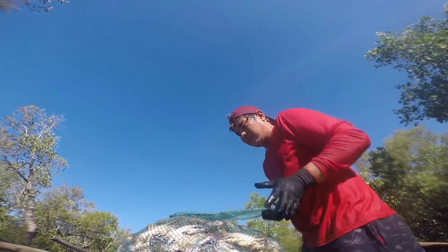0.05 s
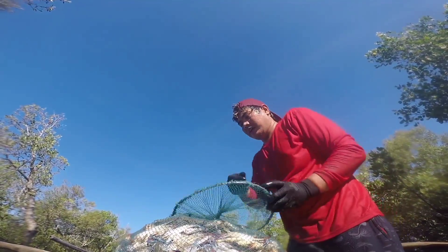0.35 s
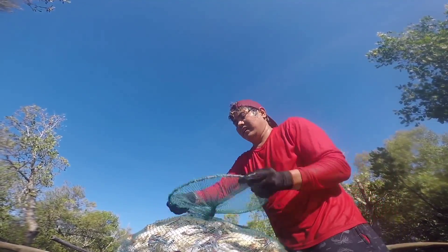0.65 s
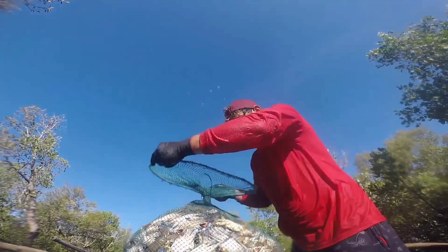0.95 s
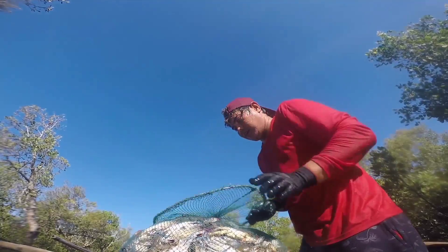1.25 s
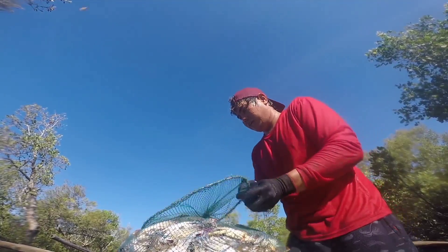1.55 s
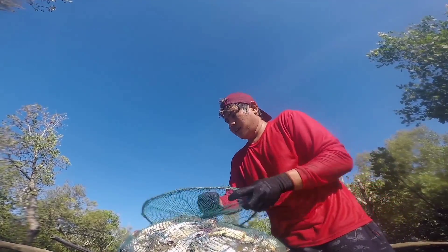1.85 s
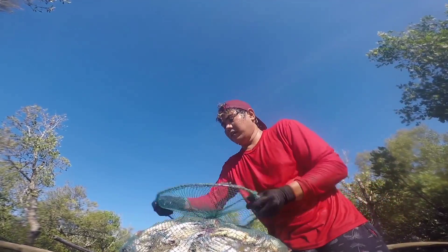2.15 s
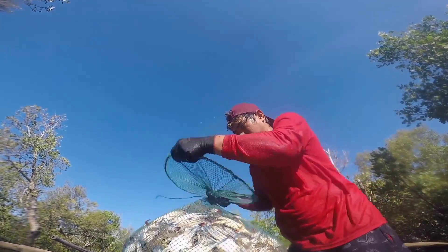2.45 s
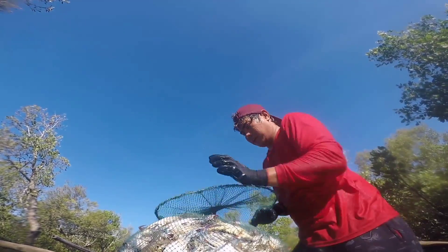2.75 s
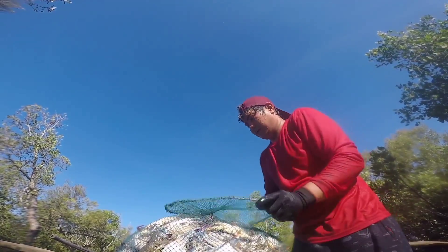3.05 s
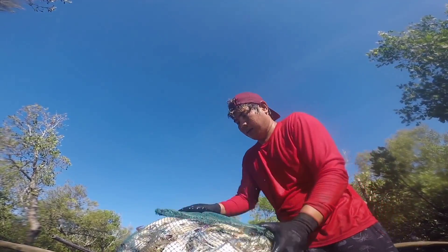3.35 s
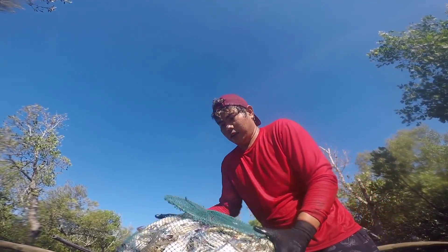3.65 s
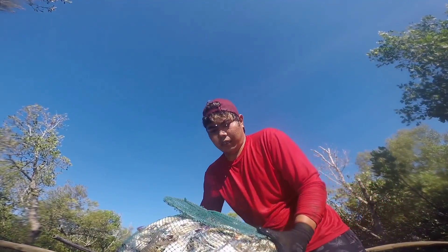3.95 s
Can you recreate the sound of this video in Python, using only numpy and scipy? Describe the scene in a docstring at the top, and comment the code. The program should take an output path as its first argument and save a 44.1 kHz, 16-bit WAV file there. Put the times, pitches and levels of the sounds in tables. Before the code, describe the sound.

Net traps knock, swish and rattle as they are turned over twice and stacked.

```python
"""Collapsible mesh crab traps are flipped twice and laid on a stack, beside a cased camera outdoors.
Friction makes the netting swish on each flip; the hoop thuds down and slides, and the stack rattles.
Impacts excite damped modes: frames knock, hollow and close, rims clack and small fittings tick.
Beneath them lie a deep wavering drone, a low rumble and faint hiss."""
import sys
import numpy as np
from scipy import signal
from scipy.fft import rfft, irfft
from scipy.io import wavfile

SR = 44100
rng = np.random.default_rng(int(sys.argv[2]) if len(sys.argv) > 2 else 0)


def store_wav(level_fs):
    """Save 16-bit WAV to argv[1]."""
    pcm = np.round(np.clip(np.atleast_2d(level_fs), -1, 1) * 32767)
    wavfile.write(sys.argv[1], SR, pcm.T.astype(np.int16))


N = 176400


def amp(db):
    """Amplitude ratio of a level in decibels."""
    return 10 ** (np.asarray(db) / 20)


def unit(x):
    """Normalisation to an rms of 1."""
    return x / np.sqrt(np.mean(x ** 2) + 1e-20)


def across(table, hz, column=1):
    """Interpolation of a table column on a log-frequency axis."""
    columns = np.transpose(table)
    return np.interp(np.log(hz + 1), np.log(columns[0] + 1), columns[column])


def envelope(curve):
    """Gain at every sample, interpolated from (time [s], level [dB]) points."""
    return amp(np.interp(np.arange(N) / SR, *np.transpose(curve)))


def swells(rows):
    """Power sum of bell-shaped envelopes, from (centre [s], half length [s], level [dB]) rows."""
    t = np.arange(N) / SR
    power = np.zeros(N)
    for centre, half, db in rows:
        offset = (t - centre) / half
        power += amp(db) ** 2 * np.exp(-offset ** 2 - (offset / 2) ** 4)
    return np.sqrt(power)


def add(mix, start_s, sound):
    """Superposition of a sound on the mix."""
    part = mix[..., max(round(start_s * SR), 0):][..., :sound.shape[-1]]
    part += sound[..., :part.shape[-1]]


def pan(db):
    """Left and right gains for a level difference; positive favours the left."""
    return amp([[db / 2], [-db / 2]])


def wander(hz):
    """Random drift: noise low-passed at hz, rms 1."""
    lowpass = signal.butter(2, hz, fs=SR, output="sos")
    return unit(signal.sosfiltfilt(lowpass, rng.standard_normal(N + 2 * SR))[SR:-SR])


def impulses(per_s, spread_db):
    """Shot noise: two Poisson trains of impulses of uneven size."""
    size = amp(spread_db * np.minimum(rng.exponential(1, (2, N)), 4))
    return size * rng.choice([-1, 1], (2, N)) * (rng.random((2, N)) < per_s / SR)


def coloured(pair, spectrum):
    """Spectral shaping of two independent signals, mixed to the coherence of the microphones."""
    hz = np.fft.rfftfreq(N, 1 / SR)
    left, independent = rfft(pair)
    coherence = np.clip(across(MICROPHONES, hz, column=2), 0, 1)
    right = coherence * left + np.sqrt(1 - coherence ** 2) * independent
    return unit(irfft(np.array([left, right]) * amp(across(spectrum, hz)), N))


def ring(modes, rise_s, detune):
    """Free decay of damped modes, peak 1; detuning stands for each blow striking a different spot."""
    t = np.arange(SR // 3) / SR
    body = np.zeros(len(t))
    for hz, db, t60 in modes:
        detuned_hz = hz * (1 + detune * rng.uniform(-1, 1))
        body += amp(db - 60 * t / t60) * np.sin(2 * np.pi * (detuned_hz * t + rng.random()))
    body *= 1 - np.exp(-(t / rise_s) ** 2)
    return body / abs(body).max()


def scuffed(body, hz, db, scuff_s=0.0047):
    """Contact noise: a short soft burst around hz, added to a ringing body."""
    age = np.arange(len(body)) / SR / scuff_s
    burst = rng.standard_normal(len(body)) * age * np.exp(-age)
    band = signal.butter(2, [hz / 2, hz * 2], "band", fs=SR)
    scuff = signal.lfilter(*band, signal.lfilter(*band, burst))
    return body + amp(db) * scuff / abs(scuff).max()


# Envelope of the drone: (time [s], level [dB])
DRONE_ENVELOPE = [(0, -21.5), (.42, -18.5), (.57, -36), (.7, -19.5), (1.0, -26), (1.9, -29), (2.2, -21),
                  (3.3, -20.5), (3.5, -26.5), (4, -25)]


def drone(hz=34.17, pitch_depth=0.0515, flutter_db=2.64, gain_db=8):
    """Frequency and amplitude modulation: one slow drift wavers a deep tone on the right."""
    waver = wander(hz=4.56)
    phase = 2 * np.pi * np.cumsum(hz * (1 + pitch_depth * waver)) / SR
    tone = np.sqrt(2) * np.sin(phase) * envelope(DRONE_ENVELOPE) * amp(flutter_db * waver)
    return tone * np.array([[0], [amp(gain_db)]])


# Spectrum of the rumble: (frequency [Hz], level [dB])
RUMBLE_SPECTRUM = [(55, -3), (88, 2.5), (120, -11.5), (180, -8), (300, -35), (900, -87)]
# Its envelope: (time [s], level [dB])
RUMBLE_ENVELOPE = [(0, -22.5), (.6, -31), (1.3, -20.5), (1.65, -25.5), (2.75, -22), (3.25, -27.5),
                   (4, -21.5)]


def rumble():
    """Sparse shot noise confined to low frequencies is heard as a lumpy rumble."""
    return coloured(impulses(per_s=260, spread_db=3.5), RUMBLE_SPECTRUM) * envelope(RUMBLE_ENVELOPE)


# Spectrum of the hiss: (frequency [Hz], level [dB])
HISS_SPECTRUM = [(520, 15), (1100, 6.5), (1950, -2.5), (2450, -3), (3300, -10), (9300, -10.5), (14000, -19)]
# Its envelope: (time [s], level [dB])
HISS_ENVELOPE = [(0, -49.5), (1.5, -49), (2.2, -44), (2.8, -49.5), (3.9, -43.5)]


def hiss():
    """Filtered Gaussian noise forms a faint broadband floor."""
    return coloured(rng.standard_normal((2, N)), HISS_SPECTRUM) * envelope(HISS_ENVELOPE)


# Hoops landing on the stack: (time [s], level [dB], fundamental [Hz])
HOOP_LANDINGS = [(.004, -17.5, 171.3), (.297, -24.5, 176), (0.619, -22.5, 171.4), (0.754, -15.5, 180),
                 (0.937, -9, 192), (1.014, -5, 246.7), (1.045, -5, 202.5), (1.192, -9, 74.7),
                 (2.04, -13, 179), (2.072, -15, 170.7), (2.324, -7.5, 165.3), (2.39, -8.5, 220),
                 (2.504, -5, 210), (2.69, -11.5, 176), (2.85, -16.5, 163.4), (3.169, -23.5, 182),
                 (3.632, -16, 86), (3.723, -13.5, 168.4)]


def hoop_thuds(t60=0.15):
    """A soft impact excites a low main mode and two weaker ones that decay twice as fast."""
    out = np.zeros((2, N))
    for s, db, hz in HOOP_LANDINGS:
        modes = [(hz, 0, t60), (hz * 0.722, -7, t60 / 2), (hz * 1.497, -10, t60 / 2)]
        add(out, s, amp(db) * ring(modes, rise_s=0.003, detune=0.0051))
    return out


def crackle(per_s=19):
    """Weak impacts at random times excite faint ticks and bumps, each at the given rate."""
    out = np.zeros((2, N))
    count = int(per_s * N / SR)
    for when, size, colour, side in rng.random((count, 4)):
        add(out, when * N / SR, amp(-53.5 + 10 * size ** 2) * tick(2400 + 4500 * colour) * pan(8 * side))
    for when, size in rng.random((count, 2)):
        add(out, when * N / SR, amp(-49.5 + 15 * size ** 2) * knock())
    return out


# Modes of the camera case: (frequency [Hz], level [dB])
CASE_MODES = [(2420, 2), (2860, -1), (4050, 0), (5500, -5.5), (6350, 0.5), (9200, -11.5)]


def tick(bright_hz, width_oct=0.82, t60=0.019, crack_db=-3, crack_s=0.0012):
    """Impulse excitation: a sharp crack rings the case, favouring the modes near bright_hz."""
    modes = [(hz, db - 10 * abs(np.log2(hz / bright_hz)) / width_oct, t60) for hz, db in CASE_MODES]
    case = ring(modes, rise_s=0.00023, detune=0.044)
    crack = rng.standard_normal(len(case)) * np.exp(-np.arange(len(case)) / SR / crack_s)
    band = signal.butter(1, [bright_hz / 2, min(bright_hz * 1.1, SR / 2 - 1000)], "band", fs=SR)
    sound = case + amp(crack_db) * signal.lfilter(*band, crack)
    return sound / abs(sound).max()


# Ticks of clips and twine: (time [s], level [dB], brightest frequency [Hz])
FITTING_TICKS = [(0.3228, -43, 5000), (.457, -46, 3040), (0.736, -42.5, 4050), (0.925, -26, 4030),
                 (1.3223, -35.5, 6270), (2.0588, -44, 4540), (2.323, -28.5, 11100), (2.706, -40.5, 6060),
                 (2.9695, -43.5, 6800), (3.0855, -32, 4860), (3.2698, -46, 4050), (3.460, -39, 2700),
                 (3.94, -35.5, 6060), (3.972, -39, 5500)]


def fittings():
    """Very brief contacts of clips and twine give bright transients, toward the left."""
    out = np.zeros((2, N))
    for s, db, hz in FITTING_TICKS:
        add(out, s, amp(db) * tick(hz) * pan(db=6))
    return out


# Blows on the rims: (time [s], level [dB], pitch [Hz])
RIM_BLOWS = [(.6965, -20.5, 1200), (0.9976, -25, 1530), (1.217, -30, 1560), (1.279, -26.5, 1203),
             (2.5057, -12, 1337)]
# Modes of a rim: (frequency [ratio to pitch], level [dB], T60 [s])
RIM_MODES = [(0.801, -10.5, 0.033), (1.001, -5, 0.03)]


def rim_clacks():
    """A hard contact gives a fast attack and excites the short-lived modes of a rim."""
    out = np.zeros((2, N))
    for s, db, hz in RIM_BLOWS:
        modes = [(hz * ratio, mode_db, t60) for ratio, mode_db, t60 in RIM_MODES]
        rim = ring(modes, rise_s=0.00048, detune=0.02)
        add(out, s, amp(db) * scuffed(rim, hz, db=-17))
    return out


# Netting dragged over netting: (centre time [s], half length [s], level [dB])
NET_SWISHES = [(.85, 0.064, -32), (1.005, 0.013, -33), (1.10, 0.043, -37.5), (1.567, 0.01, -45),
               (2.372, 0.05, -28.5), (2.507, 0.015, -36.5), (2.595, 0.054, -38.5), (3.085, 0.021, -46),
               (3.73, 0.0065, -44)]
# Spectrum of the rubbing mesh: (frequency [Hz], level [dB])
MESH_SPECTRUM = [(250, 1.5), (500, 11), (900, 10.5), (1100, 3.5), (1450, 4.5), (1950, -5.5), (2420, 4.5),
                 (2700, -7), (4100, -9), (4700, -14.5), (6300, -8), (7600, -20.5), (9700, -20),
                 (12500, -55.5)]


def netting(clump_db=1.7):
    """Stick-slip friction: knots of the mesh snag and let go in clumps, thousands of times a second."""
    snags = impulses(per_s=3000, spread_db=4) * amp(clump_db * wander(hz=140))
    return coloured(snags, MESH_SPECTRUM) * swells(NET_SWISHES) * pan(db=2.5)


# The stack shifting under the hands: (centre time [s], half length [s], boom [dB], rattle [dB])
STACK_SHIFTS = [(0.838, 0.035, -15.5, -28), (0.894, 0.027, -14.5, -19.5), (1.041, 0.041, -16, -22),
                (1.207, 0.051, -20, -31.5), (2.395, 0.061, -15, -25.5), (2.551, 0.056, -13, -23),
                (2.711, 0.027, -22.5, -34.5), (3.431, 0.037, -29.5, -38.5), (3.741, 0.047, -36, -38.5)]
# Spectrum of the stack's boom: (frequency [Hz], level [dB])
BOOM_SPECTRUM = [(35, -21.5), (80, 2.5), (120, -2), (210, -0.5), (330, -16.5), (900, -92)]
# Spectrum of its rattling frames: (frequency [Hz], level [dB])
RATTLE_SPECTRUM = [(150, -42), (260, 1.5), (380, -4.5), (500, 4.5), (900, -18), (1500, -22.5),
                   (4000, -70.5)]


def stack(jolts_per_s=900, spread_db=2.5):
    """Forced vibration: many small jolts make the stack boom and its frames rattle."""
    boom = coloured(impulses(jolts_per_s, spread_db), BOOM_SPECTRUM)
    boom *= swells([(s, half, db) for s, half, db, _ in STACK_SHIFTS])
    rattle = coloured(impulses(jolts_per_s, spread_db), RATTLE_SPECTRUM)
    rattle *= swells([(s, half, db) for s, half, _, db in STACK_SHIFTS])
    return boom + rattle


# Modes of a trap frame: (frequency [ratio to pitch], level [dB], T60 [s])
FRAME_MODES = [(0.682, -8.5, 0.016), (0.999, -11.5, 0.034), (1.299, -8.5, 0.017)]


def knock(hz=486):
    """Heavily damped resonance: a hollow frame rings briefly with a dull scuff."""
    modes = [(hz * ratio, db, t60) for ratio, db, t60 in FRAME_MODES]
    return scuffed(ring(modes, KNOCK_RISE_S, detune=0.067), hz=605, db=-11.5)


KNOCK_RISE_S = 0.002296
# Frames knocking together: (time [s], level [dB])
FRAME_COLLISIONS = [(.869, -11), (.896, -17), (1.010, -3), (1.039, -9.5), (1.279, -23.5), (1.411, -18.5),
                    (2.017, -21), (2.123, -30.5), (2.382, -10.5), (2.505, -6), (2.700, -18.5),
                    (3.132, -22.5), (3.438, -27), (3.939, -18.5)]


def frame_knocks():
    """Each collision sets a frame in free vibration, its attack centred on the listed time."""
    out = np.zeros((2, N))
    for s, db in FRAME_COLLISIONS:
        add(out, s - KNOCK_RISE_S / 2, amp(db) * knock())
    return out


def scene():
    """Linear superposition of all sources at the camera."""
    traps = netting() + stack() + hoop_thuds() + frame_knocks() + rim_clacks()
    background = drone() + rumble() + hiss()
    return traps + background + fittings() + crackle()


# The two microphones: (frequency [Hz], left phase lead [rad], coherence [0-1], left minus right [dB])
MICROPHONES = [(32.8, 1.5, 0.15, 0), (74, -1.5, 0.78, 11.5), (195, 1.28, 0.81, -5), (480, 1.4638, 0.87, 2),
               (734, 4, 0.89, 0), (1170, 2.5, 0.82, -2.5), (2390, 1.5, 0.56, 1), (9000, 1.36, 0.26, -1)]


def record(dry, cutoff_hz=13500):
    """The case shifts phase and level between the microphones; soft clipping and a low-pass follow."""
    hz = np.fft.rfftfreq(2 * N, 1 / SR)
    left_gain = amp(across(MICROPHONES, hz, column=3) / 2)
    right_lag = np.exp(-1j * across(MICROPHONES, hz))
    response = np.array([left_gain, right_lag / left_gain])
    picked_up = irfft(rfft(dry, 2 * N) * response)[:, :N]
    rounded = picked_up / (1 + picked_up ** 8) ** (1 / 8)
    lowpass = signal.firwin(255, cutoff_hz, window=("kaiser", 8), fs=SR)
    return signal.oaconvolve(rounded, lowpass[None], "same")


dry = scene()
out = record(dry)
store_wav(out)
```